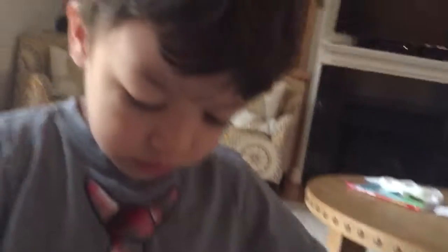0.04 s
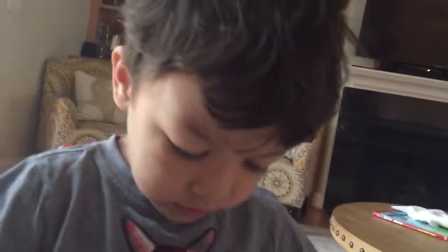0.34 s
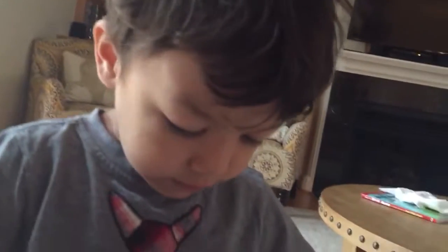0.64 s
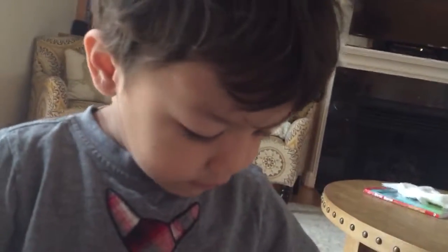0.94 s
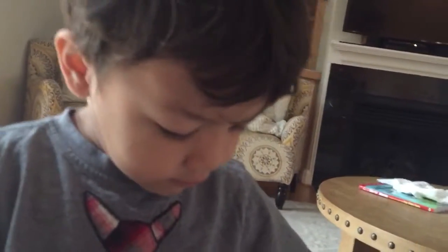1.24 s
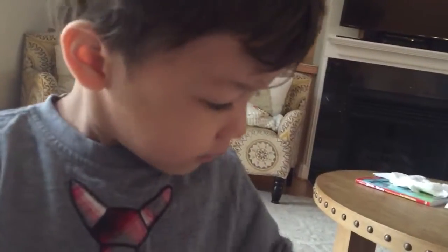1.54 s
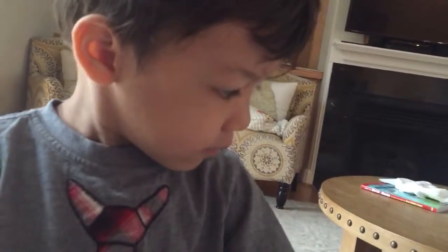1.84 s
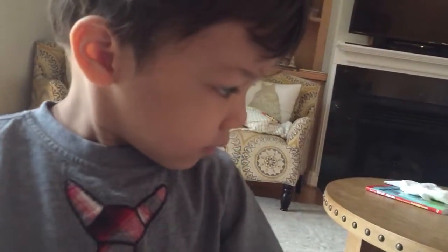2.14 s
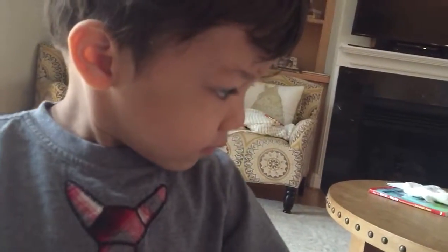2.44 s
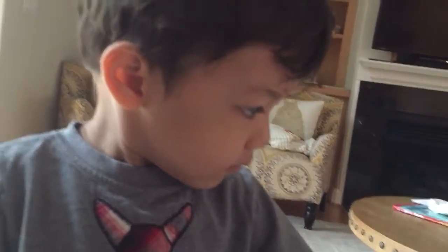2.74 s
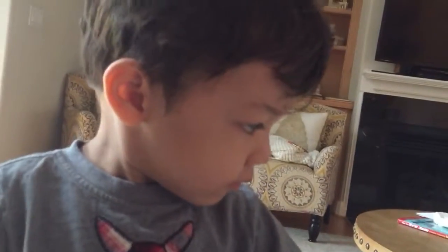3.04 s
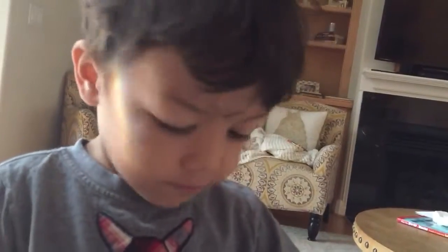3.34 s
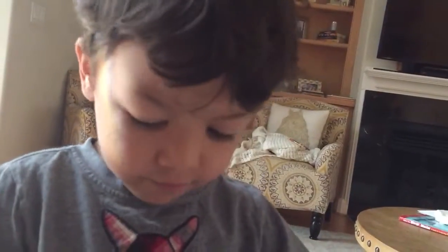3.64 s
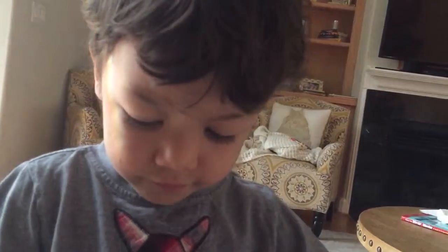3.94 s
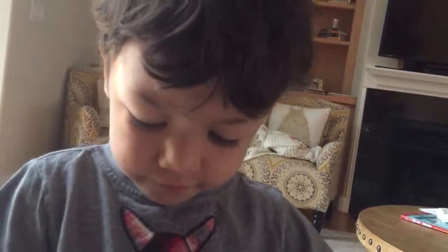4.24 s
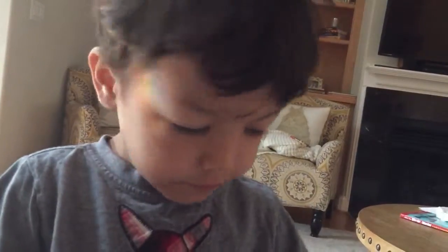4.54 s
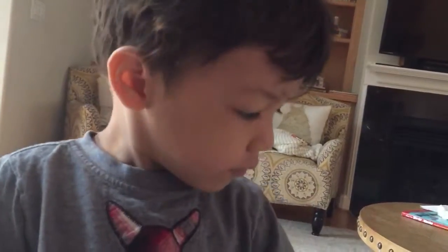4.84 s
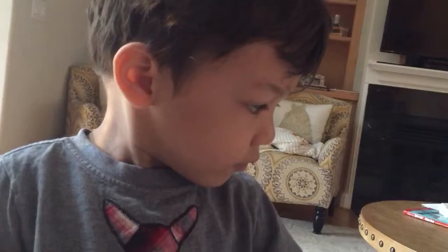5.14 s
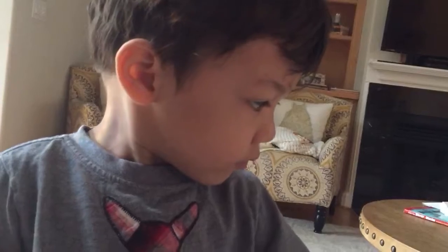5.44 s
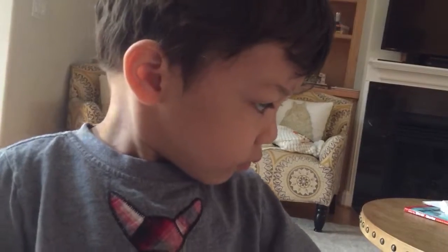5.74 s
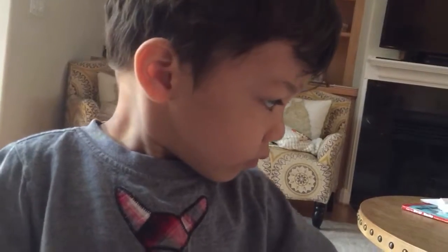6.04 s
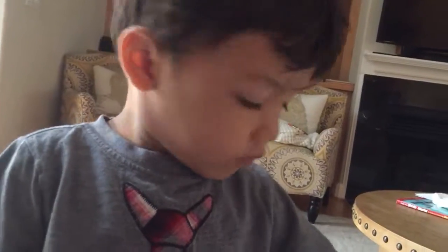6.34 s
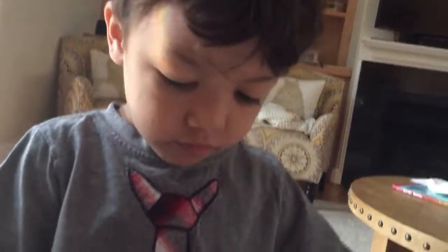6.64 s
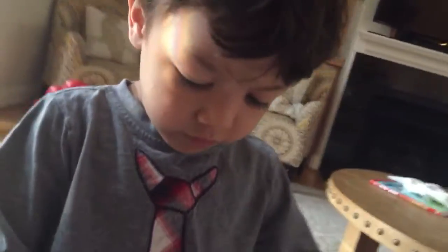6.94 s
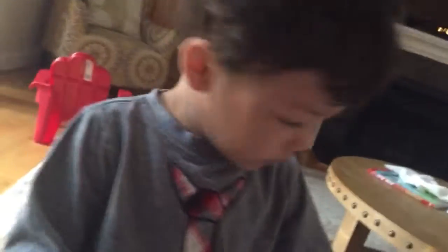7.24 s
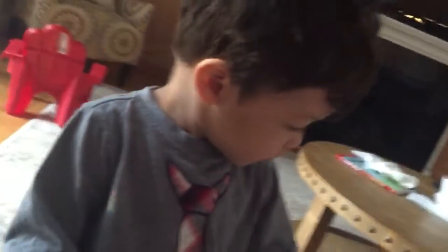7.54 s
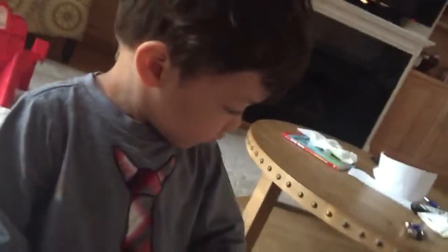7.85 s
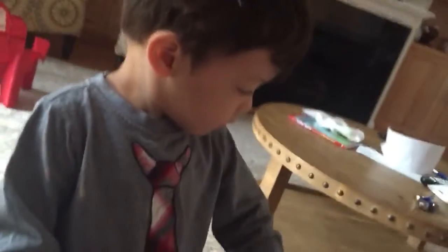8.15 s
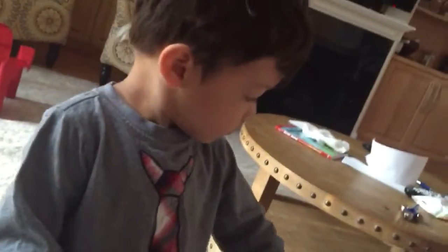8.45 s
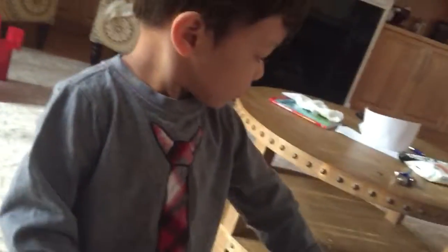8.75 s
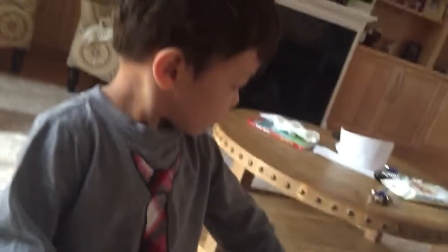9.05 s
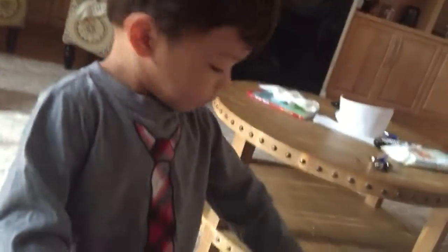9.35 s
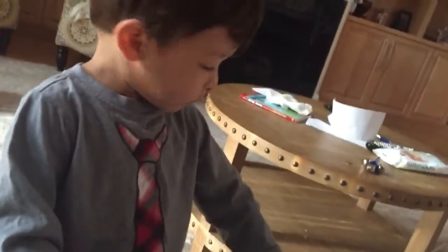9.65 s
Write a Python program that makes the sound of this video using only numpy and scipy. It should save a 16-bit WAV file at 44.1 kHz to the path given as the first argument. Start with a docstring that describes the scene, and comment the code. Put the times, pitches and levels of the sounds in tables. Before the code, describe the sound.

Thin metallic scrapes, ticks and soft hand bumps from a tape measure in a quiet room, with two sharp retracting snaps.

```python
"""A thin scrape is heard first: the blade of a steel tape measure sliding through the slot of its case,
played with on a living-room floor close to a hand-held microphone. Friction makes it hiss and grate;
impacts make it tick, and twice it whips home with a bright clatter that sets its bending modes ringing.
Hands knock and bump on the recorder and the tape case; the room rings briefly over a faint hush."""
import sys
import numpy as np
from scipy import signal
from scipy.fft import rfft, irfft, next_fast_len
from scipy.io import wavfile
from scipy.ndimage import map_coordinates

SR = 44100
rng = np.random.default_rng(int(sys.argv[2]) if len(sys.argv) > 2 else 0)


def put_to_file(sound):
    """Save the sound as 16-bit audio at rate SR, in the file named by the first command-line argument."""
    columns = np.atleast_2d(sound).T  # one column per channel
    safe = np.clip(columns, -1, 1)
    whole_steps = np.round(safe * 32767)
    wavfile.write(sys.argv[1], SR, whole_steps.astype(np.int16))


N = 435708
TIME = np.arange(N) / SR

# strokes of the blade through its slot, the last three columns relative to the hiss:
# (time [s], length [s], hiss [dB], swell from start to end [dB], sizzle [dB], rasp [dB], rub [dB])
BLADE_STROKES = [(0.0, .065, -56, 6, -1.5, -9, -10), (0.079, 0.084, -46.5, -11, -2.5, -9, -10),
                 (0.361, 0.096, -48, -3.5, -3.5, -12.5, -20.5), (0.482, 0.069, -42, 8, -4.5, -11, -17),
                 (0.722, 0.032, -47, 2, -4.5, -12.5, -28), (.8, 0.22, -77, -0.5, 1, -1, -1),
                 (1.859, 0.023, -59.5, 5.5, -2, -3.5, -3), (2.013, 0.037, -54, -6, -5.5, 1, -0.5),
                 (2.203, 0.075, -46.5, -1.5, -2.5, -13, -32.5), (2.277, 0.18, -60, -11, -2.5, -8, -18),
                 (2.515, .12, -56.5, 8, -4, -4.5, -16), (2.646, 0.15, -60.5, -4, -5.5, -1, -7.5),
                 (3.303, 0.63, -75, -0.5, 1.5, 0, -4), (3.778, 0.22, -64, 7, 0, -4.5, -7.5),
                 (4.278, 0.023, -71, 2, 5.5, -1, -5), (4.517, 0.15, -69, 5, 8, -2, -2.5),
                 (4.803, 0.0066, -53, -1.5, -1, -7.5, -11), (4.837, 0.013, -65, -4, 7, -3, -15),
                 (4.905, 0.019, -63.5, 0, 6, 0.5, -2), (5.07, 0.14, -65, 11.5, 2.5, -6, -13),
                 (5.332, 0.53, -72, 1, 2.5, -1.5, -10.5), (5.734, 0.23, -61, 1.5, 4, -12, -20),
                 (5.986, 0.3, -74.5, -2.5, 1.5, -5, -9.5), (6.404, 0.38, -72.5, -7.5, 2.5, -2, -4),
                 (6.886, 0.16, -56, -5, 3, -4.5, -8.5), (7.033, 0.15, -54.5, -2, 3.5, -14, -13.5),
                 (7.285, 0.053, -56.5, 2, 2.5, -14.5, -13.5), (7.98, 0.274, -71.5, 16.5, 1, -8, -13.5),
                 (8.227, 0.395, -56.5, 6, 1.5, -14.5, -18), (8.643, 0.23, -53, -15, 0, -12, -12),
                 (9.39, 0.2, -53, -7, -2, 3, -3), (9.615, 0.074, -52.5, -6, -1.5, -1, -8),
                 (9.72, 0.092, -67.5, -11.5, -2, -1.5, -8.5)]
# spectrum of sliding steel: (frequency [Hz], level [dB])
SCRAPE_SPECTRUM = [(300, -0.5), (700, -2), (1200, -8), (1700, -3.5), (2050, -8.5), (2450, -7), (3200, -4.5),
                   (4600, -8.5), (6000, 5), (7500, 4), (9500, 3.5), (10500, -2), (12500, 1), (16000, -12)]
# bending modes of the blade: (frequency [Hz], level [dB], t60 [s])
STEEL_MODES = [(1954, -13, 0.65), (1990, -6.5, 0.53), (2115, -10, .33), (2916, -3.5, 0.08),
               (3593, -9.5, .25), (5650, -5.5, 0.39), (6650, 2.5, 0.16), (6444, -2.5, .15), (6920, -5, .13),
               (8430, -9, .13), (7680, -5.5, .16), (8070, -0.5, .14), (8470, -3, .16), (9620, -1, .16),
               (9060, -3, 0.11), (11340, -6, .15), (14300, -13, .14), (14400, -6, .14)]
# spectrum of the background: (frequency [Hz], level [dB])
HUSH_SPECTRUM = [(15, -51), (25, -24), (48, -0.5), (114, -4.5), (236, -10), (263, -10.5), (344, -17),
                 (531, -24), (624, -20.5), (1190, -27.5), (1400, -23.5), (10100, -37.5), (12200, -35),
                 (16000, -49.5)]
# the blade catches in its slot and grates: (time [s], level [dB], frequency [Hz], half length [s])
SLOT_SQUEAKS = [(.01, -58.5, 1860, 0.021), (0.033, -57.5, 2930, .04), (0.15, -61.5, 1869, 0.13),
                (0.308, -68.5, 1880, 0.021), (0.419, -50.5, 2130, 0.0042), (2.248, -60, 3500, 0.048),
                (2.602, -60.5, 5750, 0.077), (2.643, -60.5, 2010, 0.029), (3.784, -64.5, 3350, 0.0096),
                (4.517, -64, 2010, 0.012), (4.916, -59.5, 5440, 0.021), (5.785, -66, 3200, 0.016),
                (9.229, -50.5, 744, 0.0096), (9.741, -63.5, 2870, 0.015)]
# firm bumps of the hands: (time [s], peak level [dB], frequency [Hz])
HAND_BUMPS = [(.059, -44, 120), (.117, -41.5, 128), (0.247, -43, 83), (0.54, -39.5, 156.7),
              (1.055, -41, 108.8), (1.522, -49.5, 135), (1.614, -50, 86.5), (1.885, -40.5, 76.8),
              (2.203, -53.5, 140), (3.861, -49.5, 131), (3.957, -47, 147.3), (6.691, -48.5, 103.8),
              (6.978, -43.5, 94.4), (7.17, -40.5, 121), (7.212, -38.5, 159), (7.239, -49.5, 169),
              (7.431, -47.5, 143.2), (7.533, -48.5, 168.5), (8.05, -41, 102.1), (8.151, -37.5, 122),
              (8.274, -38, 130), (8.666, -40, 217), (8.718, -38.5, 209), (8.782, -42, 156),
              (8.842, -39.5, 166), (9.132, -47, 104), (9.312, -41, 205), (9.363, -39, 181),
              (9.396, -34.5, 194), (9.643, -39.5, 136)]
# the fingers shift their grip: (time [s], length [s], peak level [dB])
GRIP_SHIFTS = [(0.089, 0.085, -42.5), (6.899, .45, -46.5), (8.082, .4, -48.5)]
# the loose blade whips against its case in a quick run of strikes:
# (time [s], level [dB], gap [s], loss per strike [dB], brightest frequency [Hz])
BLADE_WHIPS = [(0.0715, -31.5, 0.009, 4.5, 7140), (0.5048, -16, 0.0038, 1.5, 10280),
               (9.3727, -11.5, .0044, 3.5, 10500)]
# single clicks of blade and hook: (time [s], level [dB], t60 [s], brightest frequency [Hz])
BLADE_CLICKS = [(0.2167, -40, .014, 6500), (2.0043, -39, 0.031, 10200), (2.789, -58, 0.034, 12120),
                (3.93, -40, .015, 9000), (4.534, -54.5, 0.023, 12930), (4.59, -49, .014, 8000),
                (4.9046, -48, .035, 13000), (5.337, -55.5, 0.019, 12950), (6.695, -60.5, .03, 7990),
                (6.879, -55, .03, 9900), (6.892, -37.5, 0.021, 11000), (6.955, -45, .035, 8500),
                (6.982, -39.5, 0.074, 10200), (7.013, -38, .017, 10000), (7.0435, -41.5, 0.026, 10400),
                (7.102, -41.5, 0.016, 11000), (7.167, -44, 0.026, 10400), (7.241, -50.5, 0.065, 10200),
                (7.284, -48.5, 0.046, 9900), (7.9496, -49.5, 0.0073, 12960), (8.0805, -47, 0.0085, 12850),
                (8.648, -45, 0.038, 11030), (9.1205, -59, 0.013, 3810), (9.234, -46.5, 0.035, 3700),
                (9.2398, -30, 0.016, 3820), (9.2483, -39.5, .018, 8900), (9.4425, 0.5, 0.0012, 9400)]
# spectrum of struck steel: (frequency [Hz], level [dB])
STRIKE_SPECTRUM = [(200, -8), (600, -15), (1300, -18), (2000, -15.5), (2500, -9), (3100, -8.5), (4000, -11),
                   (5000, -12), (6200, -4), (9000, 0), (10500, -3), (12000, -3.5), (14000, -5.5),
                   (16000, -15.5)]
# dull knocks close to the microphone, mostly from hands on the recorder and the tape case; the rows at 0.5057 s
# and 9.4431 s are the broad knock of the blade slamming home: # (time [s], tick [dB], knock [dB], knock
# frequency [Hz], thud [dB])
CASE_KNOCKS = [(0.074, -51.5, -48, 1450, -67), (0.2169, -51.5, -80, 2360, -50.5),
               (0.5057, -25.5, -36, 503, -49), (0.865, -57, -52, 822, -53),
               (2.004, -55.5, -56.5, 1201, -62.5), (2.445, -67, -63, 604, -66.5),
               (3.930, -52, -67, 1317, -44), (4.406, -74.5, -57.5, 830, -48),
               (5.492, -77, -71.5, 1355, -67), (6.412, -71.5, -61.5, 515, -66),
               (6.8081, -55, -52, 604, -60.5), (7.9489, -51, -46.5, 1150, -42),
               (8.0801, -45.5, -42, 1160, -42.5), (8.0965, -54, -46, 1140, -44.5),
               (8.4058, -45.5, -43.5, 1130, -48.5), (8.8149, -50, -44, 1190, -46),
               (8.871, -70.5, -53.5, 1000, -48), (8.956, -91, -52, 980, -43),
               (9.1568, -57.5, -48.5, 1130, -45.5), (9.2394, -46.5, -65, 934, -65),
               (9.2483, -45, -56.5, 950, -61), (9.4431, -32.5, -36, 770, -45.5)]
# resonances of a handled shell: (frequency [Hz], bandwidth [Hz], level [dB])
SHELL_MODES = [(2430, 1800, 2.5), (3177, 750, 3.5), (4200, 1200, -6), (5650, 970, 2)]
# the case jumps as the hook slams home: (time [s], peak level [dB], frequency [Hz], t60 [s])
CASE_RECOILS = [(.5062, -18, 235, .036), (9.4432, -25, 310, .025)]
# reverberation time of the living room: (frequency [Hz], t60 [s])
ROOM_DECAY = [(150, 1), (1000, 0.22), (3000, 0.55), (7000, 0.36), (11000, .42), (16000, 0.3)]


def from_db(db):
    """Amplitude ratio: tenfold for every 20 dB."""
    return 10 ** (np.asarray(db) / 20)


def rms_one(x):
    """Normalisation to rms 1."""
    return x / np.sqrt(np.mean(x ** 2) + 1e-20)


def at_hz(points, hz):
    """Interpolation of a table along a log-frequency axis."""
    f, value = np.transpose(points)
    return np.interp(np.log(hz + 1), np.log(f), value)


def bins(size):
    """Fourier frequencies of that many samples."""
    return np.fft.rfftfreq(size, 1 / SR)


def coloured(x, gain):
    """Spectral shaping by a gain per frequency, rms 1."""
    return rms_one(irfft(rfft(x) * gain, len(x)))


def flicker(rate):
    """Random modulation of rms 1, with that many turns a second."""
    knots = rng.standard_normal(int(N / SR * rate) + 2)
    return rms_one(np.interp(TIME * rate, np.arange(len(knots)), knots))


def butter(x, hz, kind, order=2):
    """Causal low-, high- or band-pass filtering."""
    return signal.sosfilt(signal.butter(order, np.clip(hz, 10, .45 * SR), kind, fs=SR, output="sos"), x)


def add(track, s, sound):
    """Superposition of a short sound on the track at time s."""
    start = round(s * SR)
    part = sound[max(0, -start):max(0, N - start)]
    track[max(0, start):max(0, start) + len(part)] += part


def stroke_levels(resting_db=-82, lower_db=-3, upper_db=-5, arch_db=2, attack_s=.016, release_s=.03):
    """Friction noise follows sliding speed: dB of rub, rasp, lower hiss, upper hiss and sizzle."""
    t = TIME[::64]
    # even at rest the blade stirs in a restless hand
    power = from_db(resting_db + np.array([[2], [2], [lower_db], [upper_db], [-2]])) ** 2
    for s, length, hiss, swell, sizzle, rasp, rub in BLADE_STROKES:
        travel = np.clip((t - s) / length, 0, 1) - .5
        ease_s = .094 * length  # long strokes start and stop more gently
        before = np.maximum(s - t, 0) / (attack_s + ease_s)
        after = np.maximum(t - s - length, 0) / (release_s + ease_s)
        speed_db = hiss + swell * travel - arch_db * (2 * travel) ** 2
        speed_db -= 20 * np.minimum(before + after, 10)
        lower = lower_db - .91 * np.clip(sizzle + 4, -6, 8)  # light contact loses its lower hiss
        power = power + from_db(speed_db + np.array([[rub], [rasp], [lower], [upper_db], [sizzle]])) ** 2
    return [np.interp(TIME, t, 10 * np.log10(zone)) for zone in power]


def flexing(x, shortest_s=.0005, longest_s=.0011, reflect=.3):
    """Comb filtering: bending waves bounce between slot and hand over a wandering free length."""
    for stretch in (1, 3.3):
        delay_s = shortest_s + (longest_s - shortest_s) / (1 + np.exp(-flicker(1.6)))
        x = x + reflect * map_coordinates(x, [np.arange(N) - stretch * SR * delay_s], order=3)
    return rms_one(x)


def blade_peaks(hz, width_hz):
    """Resonance curves of the blade's modes, each of height 1."""
    return sum(1 / (1 + ((hz - mode_hz) / width_hz) ** 2) for mode_hz, *_ in STEEL_MODES)


def snags(per_s=22, rise_db=4.5, t60=.022):
    """Intermittent friction: the blade's edge snags at random, and the gain jumps and relaxes."""
    caught = (rng.random(N) < per_s / SR) * np.minimum(rng.exponential(1, N), 2)
    decay = from_db(-60 / (t60 * SR))
    return from_db(rise_db * signal.lfilter([1], [1, -decay], caught + 1e-18))


def slide(level_db=-2, judder_db=1.46, grit=.35):
    """Sliding friction: a dense spray of tiny slips excites the steel and judders with the hand."""
    size = next_fast_len(N, real=True)
    hz = bins(size) + 1
    slips = rng.standard_normal(N) * np.exp(grit * rng.standard_normal(N))
    slips = np.resize(flexing(slips), size)
    steel = from_db(at_hz(SCRAPE_SPECTRUM, hz)) * (1 + .17 * blade_peaks(hz, width_hz=70))
    # rub of the case, rasp of the slot, lower hiss, upper hiss, sizzle
    zones_hz = [(300, 1500), (1500, 5000), (5200, 7300), (7300, 10500), (10500, 16000)]
    out = np.zeros(N)
    for zone_db, (low, high) in zip(stroke_levels(), zones_hz):
        band = 1 / np.sqrt((1 + (low / hz) ** 10) * (1 + (hz / high) ** 20))
        noise = coloured(np.roll(slips, rng.integers(size)), band * steel)[:N]
        out += noise * from_db(zone_db)
    return out * snags() * from_db(level_db + judder_db * flicker(70))


def hush(level_db=-69.5):
    """Stationary noise: the steady background of house and microphone."""
    size = next_fast_len(N, real=True)
    spectrum = from_db(at_hz(HUSH_SPECTRUM, bins(size)))
    return from_db(level_db) * coloured(rng.standard_normal(size), spectrum)[:N]


def squeaks(edge_ratio=1.085):
    """Stick-slip: irregular slips crowd briefly into one resonance of the blade."""
    t, out = np.arange(-SR // 5, SR // 5) / SR, np.zeros(N)
    for s, level_db, hz, half_length in SLOT_SQUEAKS:
        grating = rms_one(butter(rng.standard_normal(len(t)), [hz / edge_ratio, hz * edge_ratio], "band"))
        add(out, s + t[0], from_db(level_db) * np.exp(-(t / half_length) ** 2) * grating)
    return out


def fumbles(gap_s=.042, centre_hz=144.6, spread_octaves=.88, spread_db=4):
    """An irregular pulse train: light bumps through each change of grip, in rows like HAND_BUMPS."""
    rows = []
    for s, length, level_db in GRIP_SHIFTS:
        chance = rng.uniform(-1, 1, size=(64, 3))
        for step, (late, strong, high) in zip(np.arange(0, length, gap_s), chance):
            hz = centre_hz * 2 ** (spread_octaves * high)
            rows.append((s + step + .4 * gap_s * late, level_db + spread_db * strong, hz))
    return rows


def bumps(cycles=.55, flesh_db=-17, rub_s=.0082, scuff_db=-13):
    """Heavily damped vibration: a soft push rocks the held body a cycle or two, with a rub of skin."""
    t, out, touch = np.arange(-SR // 20, SR // 10) / SR, np.zeros(N), np.zeros(N)
    contact = np.maximum(t / rub_s + .5, 0)
    for s, level_db, hz in HAND_BUMPS + fumbles():
        swell = from_db(level_db) / np.cosh(t * hz / cycles * 1.4)
        add(out, s + t[0], swell * np.sin(2 * np.pi * (hz * t + rng.random())))
        add(touch, s + t[0], from_db(level_db) * contact * np.exp(1 - contact))
    skin = rms_one(butter(rng.standard_normal(N), [50, 300], "band"))
    scuff = rms_one(butter(rng.standard_normal(N), [350, 900], "band"))
    return out + from_db(flesh_db) * touch * (skin + from_db(scuff_db) * scuff)


def strikes(per_whip=5, first_t60=.018, last_t60=.062, sag_octaves=.98):
    """Repeated impact: the single clicks, plus each whip as a run of ever longer, duller strikes."""
    rows = list(BLADE_CLICKS)
    for s, level_db, gap, loss_db, hz in BLADE_WHIPS:
        for k, along in enumerate(np.linspace(0, 1, per_whip)):
            t60 = first_t60 + along * (last_t60 - first_t60)
            rows.append((s + k * gap, level_db - k * loss_db, t60, hz * 2 ** (-sag_octaves * along)))
    return rows


def stored_db(t60):
    """Energy transfer: the briefer a strike, the less the blade stores to shiver and ring on."""
    return 7 * np.log10(t60 / .012)


def clatter(focus_db=9.5, focus_octaves=.39, shiver_db=-21, shiver_t60=.1):
    """Impact excitation: each strike is a crack of crowded steel modes, then a weaker shiver."""
    size = 8192
    t, hz, out = np.arange(size) / SR, bins(size) + 1, np.zeros(N)
    peaks = 1 + .49 * blade_peaks(hz, width_hz=45)
    for s, level_db, t60, centre_hz in strikes():
        focus = focus_db * np.exp(-.5 * (np.log2(hz / centre_hz) / focus_octaves) ** 2)
        crack = coloured(rng.standard_normal(size), peaks * from_db(at_hz(STRIKE_SPECTRUM, hz) + focus))
        fade = from_db(-60 * t / t60) + from_db(shiver_db + stored_db(t60) - 60 * t / shiver_t60)
        add(out, s, from_db(level_db) * crack * fade)
    return out


def blade_ring(ring_db=-35, scatter_db=2, flutter_per_s=170):
    """Free vibration: the struck blade's clearest modes ring on, fluttering as it wobbles on the case."""
    t, out = np.arange(SR // 2) / SR, np.zeros(N)
    knots = np.arange(flutter_per_s + 2)
    for hz, mode_db, t60 in STEEL_MODES:
        mode = from_db(mode_db - 60 * t / t60) * np.exp(2j * np.pi * hz * t)
        for s, level_db, strike_t60, _ in strikes():
            phasors = rng.standard_normal((len(knots), 2)) @ [1, 1j]  # random amplitude and phase
            wobble = np.interp(t * flutter_per_s, knots, phasors)
            drive_db = level_db + ring_db + stored_db(strike_t60) + scatter_db * rng.standard_normal()
            add(out, s, from_db(drive_db) * (mode * wobble).real)
    return out


def cavity(x, round_trip_s=.0019, reflect=.22):
    """Interference: sound crosses a hollow body and comes back, which ripples its spectrum."""
    n = np.arange(len(x))
    return x + reflect * np.interp(n - round_trip_s * SR, n, x, left=0)


def case_knocks(thud_lag_s=.0012, buzz=.067, buzz_t60=.035, hollow_db=-6, tick_t60=.027):
    """Structure-borne sound: hands on the recorder and tape case, and the blade slamming home, give a tick, a
    dull knock, a thud."""
    size = SR // 10
    t, out = np.arange(size) / SR, np.zeros(N)
    for s, tick_db, knock_db, knock_hz, thud_db in CASE_KNOCKS:
        blow = buzz * rng.standard_normal(size) * from_db(-60 * t / buzz_t60)
        blow[0] += 1
        short_blow = blow * from_db(-60 * t / tick_t60)
        modes = np.zeros(size)
        for hz, width, mode_db in SHELL_MODES:
            mode = butter(short_blow, [hz - width / 2, hz + width / 2], "band", order=1)
            modes += from_db(mode_db) * rms_one(mode)
        tick = butter(modes, 6900, "low", order=10)
        hollow = from_db(hollow_db) * rms_one(butter(blow, [knock_hz, knock_hz * 1.3], "band"))
        knock = rms_one(butter(blow, [knock_hz * .51, knock_hz * 1.2], "band")) + hollow
        thud = butter(blow, [90, 250], "band")
        for lag, part, level_db in (0, tick, tick_db), (0, knock, knock_db), (thud_lag_s, thud, thud_db):
            add(out, s + lag, from_db(level_db) * rms_one(cavity(part)) / np.sqrt(10))  # rms over 10 ms
    return out


def recoils():
    """Damped oscillation: the heavy spool shakes the case for a few cycles."""
    t, out = np.arange(SR // 5) / SR, np.zeros(N)
    for s, level_db, hz, t60 in CASE_RECOILS:
        add(out, s, from_db(level_db - 60 * t / t60) * np.sin(2 * np.pi * hz * t))
    return out


def room(x, first_echo_s=.006, warmth_db=3):
    """Reverberation: diffuse reflections decay exponentially in each band, slowest in the bass."""
    t, tail = np.arange(SR) / SR, np.zeros(SR)
    edges_hz = np.geomspace(60, 18000, num=11)
    white = rng.standard_normal((2, SR))
    for k, (low, high) in enumerate(zip(edges_hz, edges_hz[1:])):
        hz = np.sqrt(low * high)
        gain_db = warmth_db * (hz < 3000) - 60 * t / at_hz(ROOM_DECAY, hz)
        tail += butter(white[k % 2], [low, high], "band") * from_db(gain_db)
    tail *= np.clip(t / first_echo_s - 1, 0, 1)
    return signal.fftconvolve(x, tail / np.linalg.norm(tail))[:N]


def scene():
    """Direct and reverberant sound add: steel fills the room; knocks and bumps are close, nearly dry."""
    steel = clatter() + blade_ring()
    friction = slide() + squeaks()
    hands, jolts = case_knocks() + bumps(), recoils()
    echo = room(from_db(-12) * steel + from_db(-11) * friction
                + from_db(-23) * hands + from_db(-31) * jolts)
    return (steel + friction + hands + jolts + echo + hush())[None]


def record(dry, bass_hz=42, ceiling=.75, cutoff_hz=16000):
    """Band limiting and saturation: the microphone sheds deep bass, rounds peaks and cuts the top."""
    rounded = ceiling * np.tanh(butter(dry, bass_hz, "high", order=3) / ceiling)
    return signal.sosfilt(signal.ellip(10, .1, 80, cutoff_hz, fs=SR, output="sos"), rounded)


dry = scene()
out = record(dry)
put_to_file(out)
```